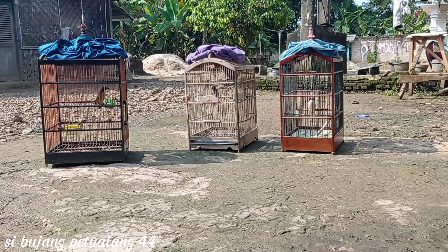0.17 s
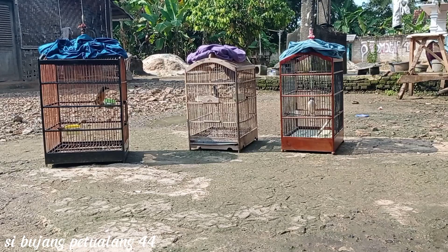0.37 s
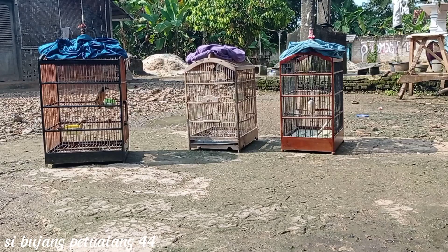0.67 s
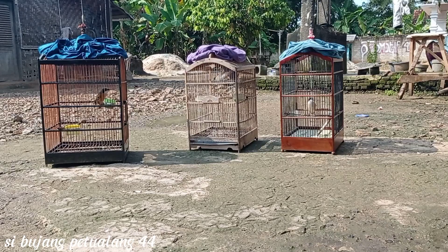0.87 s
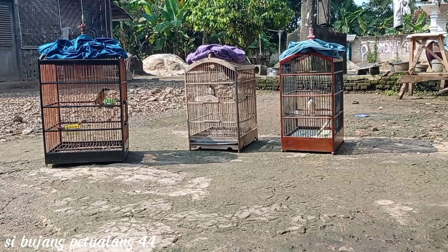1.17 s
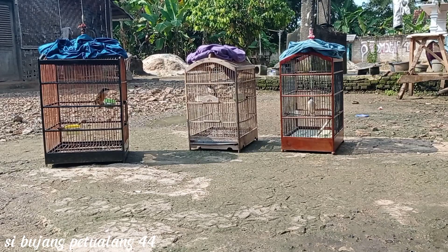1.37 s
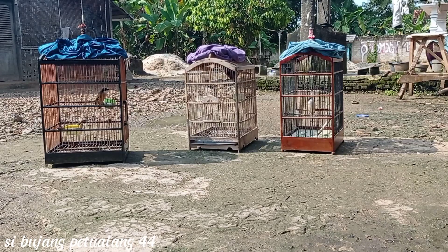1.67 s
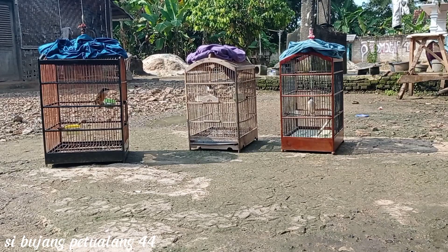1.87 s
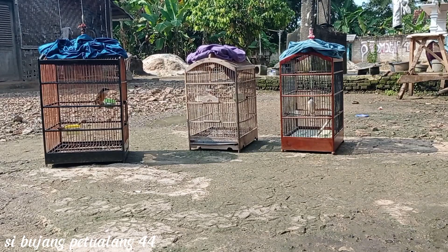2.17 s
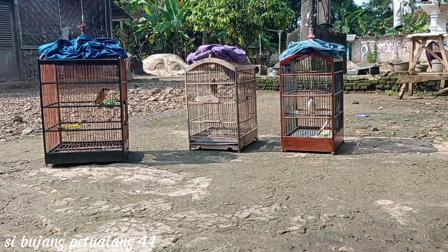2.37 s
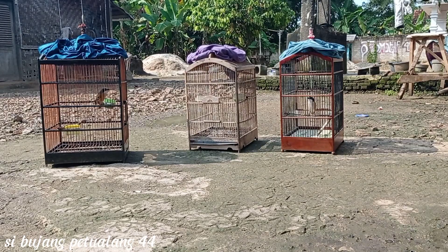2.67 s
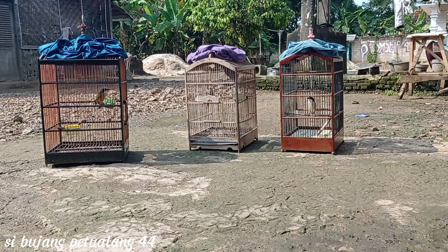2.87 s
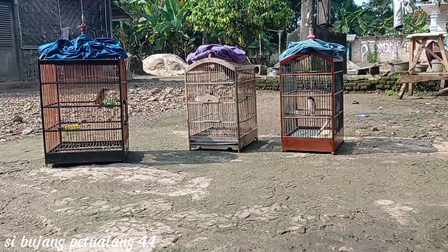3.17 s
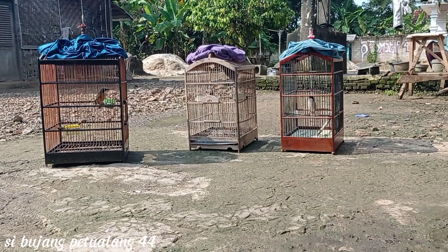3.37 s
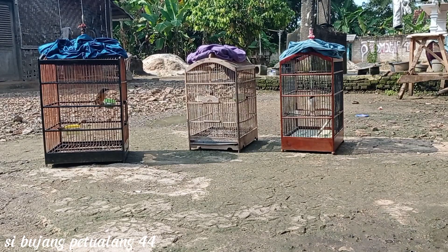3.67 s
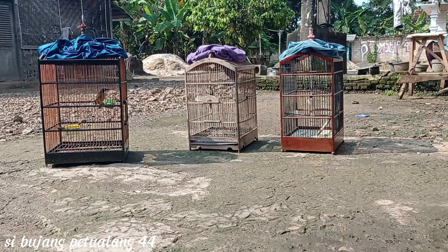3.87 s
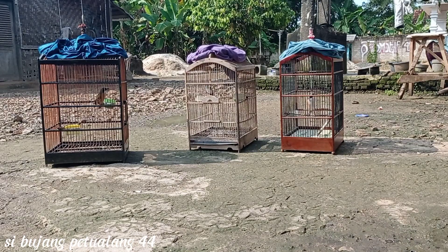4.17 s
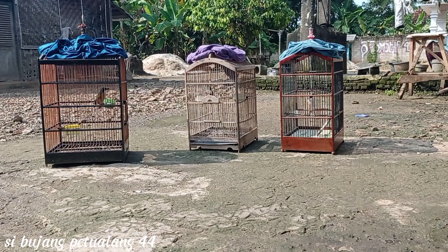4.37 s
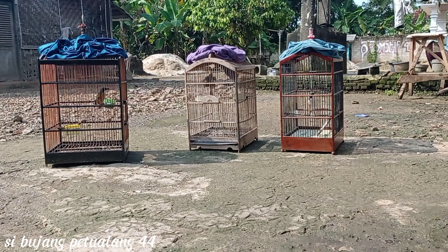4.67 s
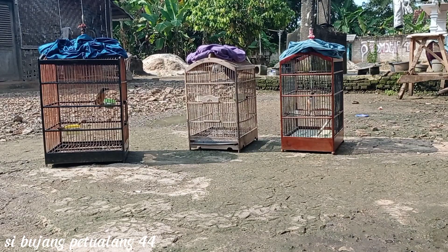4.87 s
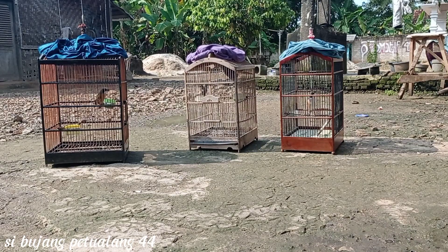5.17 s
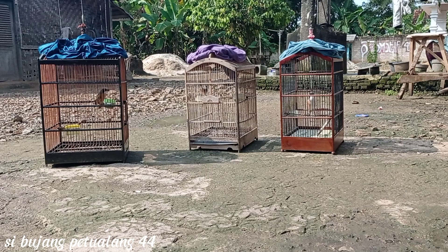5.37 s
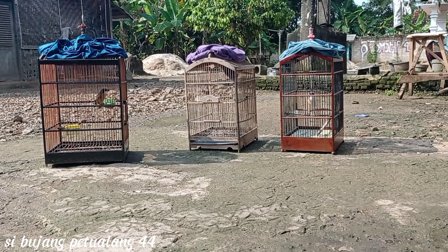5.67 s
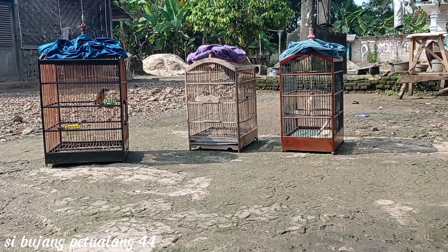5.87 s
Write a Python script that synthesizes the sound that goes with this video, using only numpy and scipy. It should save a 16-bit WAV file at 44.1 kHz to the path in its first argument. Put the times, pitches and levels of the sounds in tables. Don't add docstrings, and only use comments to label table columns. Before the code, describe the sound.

Abrupt raspy bird calls close by, answered by a breathier rival, over small far birds, a thin insect whine and a low engine.

```python
import sys
import numpy as np
from scipy import signal
from scipy.fft import rfft, irfft
from scipy.io import wavfile
from scipy.ndimage import uniform_filter1d, minimum_filter1d

SR = 44100
rng = np.random.default_rng(int(sys.argv[2]) if len(sys.argv) > 2 else 0)


def digitize_waveform(pressure):
    field = np.atleast_2d(pressure).T
    bounded = np.clip(field, -1, 1)
    quanta = np.round(bounded * 32767).astype(np.int16)
    wavfile.write(sys.argv[1], SR, quanta)


def voltage_ratio(level):
    return 10 ** (np.asarray(level, float) / 20)


N = 265217


def evened(x):
    return x / np.sqrt(np.mean(x ** 2) + 1e-20)


def read(points, hz):
    f, value = np.transpose(points)
    return np.interp(np.log(hz + 1), np.log(f + 1), value)


def curve(points, t):
    return np.interp(t, *np.transpose(points))


def play(sounds):
    track = np.zeros(N)
    for s, sound in sounds:
        part = track[round(s * SR):][:len(sound)]
        part += sound[:len(part)]
    return track


def wobble(size, hz):
    span = max(int(SR / hz / 2), 2)
    noise = rng.standard_normal(size + 4 * span)
    smooth = uniform_filter1d(uniform_filter1d(noise, span), span)
    return evened(smooth[2 * span:][:size])


def coloured(x, spectrum):
    gain = voltage_ratio(read(spectrum, np.fft.rfftfreq(len(x), 1 / SR)))
    return irfft(rfft(x) * gain, len(x))


def stack(hz, partials):
    turns = np.cumsum(hz) / SR
    return sum(g * np.cos(2 * np.pi * k * turns) for k, g in partials)


# (frequency [Hz], level [dB])
LATE_TREBLE = [(13600, -68), (14400, -18), (15200, -5), (16000, -30)]


def rasp(effort, arch, beak, flutter_hz, swing, depth, jitter, breath, late=0):
    s, effort_db = np.transpose(effort)
    t = np.arange(s[0], s[-1], 1 / SR)
    share = (t - s[0]) / 0.15
    hz = curve(arch, share)
    flutter = 2 * np.pi * np.cumsum(flutter_hz * (1 + 0.07 * wobble(len(t), 60))) / SR
    shake = jitter * (1 + 1.72 * share) * wobble(len(t), 540)
    hz = hz * (1 + swing * np.sin(flutter) + shake)
    tone = evened(stack(hz, [(k, 1) for k in range(1, 13)]))
    breath = np.clip(breath * (1 + 1.2 * share), 0, 1)
    drive = (1 - breath) * tone + breath * rng.standard_normal(len(t))
    drive *= (1 + depth * np.cos(flutter)) * voltage_ratio(2.2 * wobble(len(t), 300))
    lateness = np.clip((share - 0.35) / 0.75, 0, 1)
    whistle = late * lateness * coloured(drive, LATE_TREBLE)
    edge = np.minimum(1, np.minimum((t - s[0]) / 0.0019, (s[-1] - t) / 0.0045))
    return s[0], evened(coloured(drive, beak) + whistle) * voltage_ratio(np.interp(t, s, effort_db)) * edge


# (start [s], held [s], effort [dB], change while held [dB])
NEAR_RASPS = [
    (0.928, 0.076, -5, -4.5),
    (2.336, 0.057, -8.5, -0.5),
    (3.354, 0.064, -13.5, 4.5),
    (4.572, 0.066, -12, 1.5),
    (5.374, 0.069, -14.5, 8.5),
]
# (share of length, pitch [Hz])
NEAR_ARCH = [(0, 1070), (.1, 1190), (0.351, 1240), (.55, 1243), (0.718, 1075), (0.999, 896)]
# (frequency [Hz], level [dB per Hz])
NEAR_BEAK = [(700, -20.5), (1250, -21), (1800, -2.5), (2400, -0.5), (3050, 8.5), (3700, 1.5), (4400, -3),
             (5000, -12), (6400, -10.5), (8000, -19), (9800, -42.5),
             (12600, -31), (13300, -44), (13900, -60), (16000, -62)]


def snapped(s, held, db, change_db):
    full = s + 0.0083
    end = full + held
    return [(s, db - 29), (full, db), (end, db + change_db), (end + 0.09, db + change_db - 22.5)]


def near_bird():
    return play(rasp(snapped(*row), NEAR_ARCH, NEAR_BEAK, flutter_hz=228, swing=0.068,
                     depth=0.45, jitter=0.01, breath=0.11, late=1) for row in NEAR_RASPS)


# (start [s], time to the peak [s], peak effort [dB], fading [s])
RIVAL_RASPS = [
    (0.078, 0.078, -21.5, 0.18),
    (0.474, 0.11, -16.5, 0.13),
    (4.075, 0.11, -14, 0.084),
    (4.439, 0.12, -16.5, .14),
    (5.976, 0.038, -16.5, .1),
]
# (share of length, pitch [Hz])
RIVAL_ARCH = [(0, 1117), (.35, 1150), (0.652, 1316), (1.2, 1370)]
# (frequency [Hz], level [dB per Hz])
RIVAL_BEAK = [(700, -20.5), (1250, -17), (2000, -6), (2800, -3), (4000, 3.5), (5400, 3), (6500, -7),
              (8000, -12), (9800, -26)]
# (frequency [Hz], level [dB per Hz])
RIVAL_TOP = [(10600, -39.5), (13600, -29), (15000, -23), (16000, -20)]


def swelled(s, rise, db, fade):
    peak = s + rise
    return [(s, db - 20.5), (s + 0.022, db - 10), (peak, db), (peak + 0.42 * fade, db - 8), (peak + fade, db - 64)]


def rival_bird():
    return play(rasp(swelled(*row), RIVAL_ARCH, RIVAL_BEAK + RIVAL_TOP, flutter_hz=265, swing=0.065,
                     depth=0.5, jitter=0.019, breath=0.24) for row in RIVAL_RASPS)


def note(s, length, from_hz, to_hz, db, overtone_db, burr, flicker_db):
    u = np.linspace(0, 1, int(length * SR) + 8)
    hz = (from_hz + (to_hz - from_hz) * u) * (1 + burr * wobble(len(u), 450))
    low_notes = hz < 2250
    tone = stack(hz, [(1, 0.92), (2, voltage_ratio(overtone_db)), (3, voltage_ratio(overtone_db - 19)), (5, voltage_ratio(overtone_db - 47)),
                      (6, voltage_ratio(overtone_db - 44)), (7, voltage_ratio(overtone_db - 36) * low_notes)])
    edge = np.minimum(1, np.minimum(u * length / 0.0018, (1 - u) / 0.31))
    return s, voltage_ratio(db + 1.5 + flicker_db * wobble(len(u), 308)) * tone * np.sqrt(edge)


# (frequency [Hz], level [dB])
SONG_HISS = [(1400, -50), (1900, -20), (4000, 1), (7000, 1), (9000, -21), (12000, -17.5), (15000, -24)]


def breathy(song, db):
    strength = np.sqrt(abs(uniform_filter1d(song ** 2, 300)))
    return song + voltage_ratio(db) * coloured(strength * rng.standard_normal(N), SONG_HISS)


# (start [s], length [s], from [Hz], to [Hz], level [dB])
REEDY_NOTES = [
    (2.701, 0.017, 1845, 2040, -31),
    (2.709, 0.016, 2108, 3160, -18.5),
    (2.719, 0.0065, 2120, 3200, -20),
    (2.727, 0.0061, 2640, 2070, -14),
    (2.732, 0.0486, 2007, 2097, -17.5),
    (2.776, 0.0051, 2220, 3430, -14),
    (2.835, .032, 2194, 2866, -25),
]
# (start [s], length [s], from [Hz], to [Hz], level [dB])
PURE_NOTES = [(2.761, 0.018, 4295, 4360, -8), (2.779, 0.021, 6400, 6930, -10.5),
              (2.785, 0.0082, 5660, 3880, -18), (2.789, .014, 3550, 2740, -15),
              (2.792, 0.0295, 5120, 5450, -8), (2.816, .03, 6330, 5930, -15),
              (2.834, 0.0277, 5600, 6140, -16), (2.866, 0.0256, 3346, 3650, -17),
              (2.881, 0.021, 3900, 4200, -8), (2.889, .017, 2844, 2734, -16.5),
              (2.902, .0075, 4515, 4670, -5.5), (2.909, 0.012, 4630, 4860, -10.5),
              (2.935, 0.0526, 5030, 4643, -26), (3.002, 0.022, 4730, 4680, -22.5)]


def singer():
    reedy = play(note(*row, overtone_db=3.5, burr=0.008, flicker_db=1.5) for row in REEDY_NOTES)
    pure = play(note(*row, overtone_db=-33.5, burr=0.026, flicker_db=3.0) for row in PURE_NOTES)
    return breathy(reedy + pure, -7.5)


# (time [s], peak level [dB], centre [Hz])
KNOCKS = [(2.572, -40, 5895), (3.015, -22.5, 1020), (3.031, -20.5, 1120), (3.323, -26, 2977),
          (3.332, -39, 7010), (3.971, -44, 5000), (0.911, -33, 4800), (0.933, -27, 1836),
          (2.341, -14, 1700), (3.357, -29, 1700), (5.379, -28, 1700)]


def knock(s, db, hz):
    t = np.arange(1800) / SR
    tick = rng.standard_normal(len(t)) * voltage_ratio(db - 60 * t / 0.11)
    return s, coloured(tick, [(hz / 3, -22), (hz / 1.7, -2), (hz * 0.81, -2), (hz * 1.9, -14), (20000, -22)])


def cage_knocks():
    return play(knock(*row) for row in KNOCKS)


# (start [s], time to the peak [s], peak effort [dB], fading [s])
DISTANT_RASPS = [
    (1.75, .14, -37.5, 0.089),
    (5.85, 0.038, -35.5, 0.12),
]
# (start [s], starting pitch [Hz], level [dB])
RISING_CHIPS = [
    (1.345, 6550, -43),
    (1.856, 3890, -29.5),
    (2.093, 6270, -40),
    (2.202, 4500, -46),
    (2.647, 5800, -38),
    (4.821, 6400, -33.5),
    (5.035, 5780, -32.5),
    (5.893, 4960, -38),
    (5.858, 3700, -41),
]
# (start [s], starting pitch [Hz], level [dB])
LEVEL_CHIPS = [(0.265, 3657, -27.5), (0.776, 7670, -43), (0.834, 4560, -38), (1.493, 4210, -41.5),
               (1.562, 4280, -36.5), (1.756, 5470, -37), (1.767, 2775, -37), (1.815, 6500, -46),
               (2.294, 6260, -38), (3.305, 5450, -33.5), (3.296, 4483, -40), (3.91, 6260, -33.5),
               (5.036, 5120, -46.5), (5.209, 5870, -33), (5.21, 5100, -49), (5.21, 6800, -52),
               (2.285, 7400, -55), (5.364, 5950, -37), (5.942, 1684, -30)]
# (start [s], starting pitch [Hz], level [dB])
FALLING_TICKS = [(1.653, 3940, -38.5), (1.754, 3940, -34), (1.81, 3730, -33.5), (1.888, 3400, -29.5),
                 (1.918, 3820, -36), (3.63, 4000, -33), (3.69, 3930, -32.5), (3.753, 3930, -31),
                 (3.825, 4020, -35), (4.868, 7800, -45), (5.0, 7750, -52), (3.69, 6700, -44),
                 (3.752, 6500, -45.5), (3.825, 6840, -51), (5.165, 9090, -41)]
# (start [s], length [s], from [Hz], to [Hz], level [dB])
DRAWN_WHISTLES = [(1.669, 0.21, 3050, 3260, -46.5), (2.099, 0.22, 2850, 3050, -50),
                  (2.238, 0.13, 2800, 3120, -43.5), (3.717, 0.23, 2610, 2390, -44),
                  (5.123, 0.14, 1730, 1903, -36.5), (5.228, 0.081, 1706, 1400, -36),
                  (5.677, 0.1, 1807, 1700, -44.5), (5.783, 0.074, 1750, 1614, -39),
                  (5.833, 0.17, 1500, 1630, -43), (3.131, .04, 3900, 6970, -36),
                  (0.717, .2, 4100, 4080, -44), (5.897, 0.071, 7120, 7600, -42)]


def chips(rows, length, glide, overtone_db):
    return [(s, length, hz, hz * (1 + glide), db, overtone_db) for s, hz, db in rows]


def far_birds():
    rasps = play(rasp(swelled(*row), RIVAL_ARCH, RIVAL_BEAK + RIVAL_TOP, flutter_hz=240, swing=0.07,
                      depth=0.5, jitter=0.02, breath=0.4) for row in DISTANT_RASPS)
    calls = chips(RISING_CHIPS, 0.0295, 0.1, -30)
    calls += chips(LEVEL_CHIPS, 0.0343, -0.037, -35)
    calls += chips(FALLING_TICKS, 0.01, -0.052, -21)
    short = play(note(*row, burr=0.014, flicker_db=1.85) for row in calls)
    drawn = play(note(*row, overtone_db=-51, burr=0.024, flicker_db=2.5) for row in DRAWN_WHISTLES)
    return rasps + short + drawn


# (start [s], length [s], third partial [Hz], level [dB])
FOWL_CALLS = [
    (5.768, 0.13, 1090, -34),
    (5.89, 0.107, 1162, -29),
]


def honk(s, length, hz, db):
    u = np.linspace(0, 1, int(length * SR))
    roughness = (1 + 0.0055 * wobble(len(u), 206) + 0.0084 * wobble(len(u), 23.4))
    pitch = hz / 3 * (1 + 0.0427 * np.sqrt(u)) * roughness
    tone = stack(pitch, [(2, voltage_ratio(-7.5)), (3, 0.75), (4, voltage_ratio(-9.0)), (5, voltage_ratio(-21))])
    return s, voltage_ratio(db - 6 * u + wobble(len(u), 80)) * tone * signal.windows.tukey(len(u), 0.2)


def fowl():
    return play(honk(*row) for row in FOWL_CALLS)


# (frequency [Hz], level [dB])
DISTANCE = [(300, -6), (7000, 2), (9500, -29), (16000, -14)]


def from_afar(x):
    return coloured(x, DISTANCE)


# (start [s], length [s], starting pitch of the second partial [Hz], level [dB])
INSECT_PHRASES = [
    (0.075, .5, 5830, -47),
    (.6, 0.79, 5890, -47),
    (1.472, 0.85, 5890, -48.5),
    (2.505, 0.83, 5870, -45.5),
    (3.488, .65, 5880, -46.5),
    (4.203, 0.61, 5740, -49),
    (4.678, 0.68, 5850, -49.5),
    (5.394, 0.59, 5840, -47),
]


def whine(s, length, hz, db):
    t = np.arange(0, length, 1 / SR)
    pitch = (hz - 200 * t) / 2 * (1 + 0.0044 * wobble(len(t), 200))
    mid_db = db + 10.5 * (t / length - 1)
    top_db = db - 19 + 3 * t / length
    levels = [(1, mid_db - 3.5 + 4.7 * wobble(len(t), 3.3)), (2, mid_db), (3, top_db - 27), (4, top_db)]
    partials = [(k, voltage_ratio(g + 3.33 * wobble(len(t), 90) + 3.5 * wobble(len(t), 6.1))) for k, g in levels]
    return s, stack(pitch, partials) * signal.windows.tukey(len(t), 0.12)


def insect():
    return play(whine(*row) for row in INSECT_PHRASES)


# (time [s], level [dB], boom of the pipe and ground [Hz])
ENGINE = [(.08, -24, 145), (.26, -9.5, 159), (.6, -4, 112.5), (1.3, -5.5, 154.4), (1.9, -0.5, 131.6),
          (2.4, -6.5, 145), (2.68, 4.5, 160.4), (2.95, -10.5, 156), (3.25, 0.5, 145), (3.5, 4.5, 150),
          (3.62, -2, 160), (3.85, 3.5, 176.6), (4.05, 2, 147), (4.7, 4, 129.6), (4.9, 4, 150.8),
          (5.35, 2.5, 154), (5.56, -4, 156), (5.85, 1, 147)]
# (time [s], firings per second [Hz])
FIRING = [(0, 28.5), (1.2, 28.7), (2.0, 29.0), (2.9, 29.2), (3.4, 28.9), (4.0, 28.5), (6.02, 28.6)]
# (multiple of the firing rate, level [dB])
ORDERS = [(2, -65), (3, -40.5), (4, -42.5), (5, -45), (6, -47), (7, -52), (8, -81), (9, -78), (10, -52.5),
          (11, -47), (12, -44), (13, -58.5), (14, -60.5), (15, -67.5)]


def engine():
    t = np.arange(N) / SR
    s, *columns = np.transpose(ENGINE)
    loud_db, boom_hz = (np.interp(t, s, c) for c in columns)
    hz = curve(FIRING, t) * (1 + 0.0056 * wobble(N, 5.1))
    turns = np.cumsum(hz) / SR
    throb = np.zeros(N)
    for k, db in ORDERS:
        lift_db = 14 * np.exp(-(np.log(k * hz / boom_hz) / 0.13) ** 2)
        waver_db = 2.2 * wobble(N, 2.85) + 1.1 * wobble(N, 14.7)
        phase = 2 * np.pi * (k * turns + 0.31 * rng.random())
        throb += voltage_ratio(db + loud_db + lift_db + waver_db) * np.cos(phase)
    return throb


# (frequency [Hz], level [dB per Hz])
AIR = [(25, -41), (50, -37), (75, 7), (190, -9.5), (330, -7.5), (460, -16.5), (1070, -23), (1960, -35.5),
       (2290, -34.5), (3200, -30.5), (4900, -43), (5900, -31), (7670, -57.5), (16000, -60)]
# (time [s], level [dB])
AIR_SWELL = [(.14, -100), (.27, -54), (.4, -51.5), (1.2, -49.5), (2.1, -43.5), (2.67, -44), (2.8, -50.5),
             (3.2, -44.5), (4.2, -48), (4.45, -46), (6.01, -50.5)]


def air():
    frames, hz = N // 256 + 5, np.fft.rfftfreq(1024, 1 / SR)
    a, b, patches = rng.standard_normal((frames, 513, 3)).T
    patches_db = 3.0 * evened(uniform_filter1d(uniform_filter1d(patches, 10, 0), 16, 1))
    z = (a + 1j * b) * voltage_ratio(read(AIR, hz)[:, None] + patches_db)
    x = signal.istft(z, nperseg=1024, noverlap=768)[1][:N]
    return evened(x) * voltage_ratio(curve(AIR_SWELL, np.arange(N) / SR) + 13.5)


# (frequency [Hz], time to fall 60 dB [s])
YARD = [(800, 0.74), (2600, 0.44), (5000, 0.5), (8000, 0.32), (10500, 0.26), (14000, 0.13)]


def yard(x, first_s):
    taps = np.zeros(SR)
    at = np.arange(int(first_s * SR), SR - 20, 20)
    spots = at + rng.integers(0, 20, len(at))
    taps[spots] = rng.choice([-1., 1.], len(at))
    hz, t, z = signal.stft(taps, SR, nperseg=256)
    decay = voltage_ratio(-60 * t / read(YARD, hz)[:, None])
    tail = signal.istft(z * decay, SR, nperseg=256)[1]
    return signal.fftconvolve(x, tail / np.linalg.norm(tail))[:N]


def scene():
    near, rival = near_bird(), rival_bird()
    song = singer() + cage_knocks()
    far = from_afar(far_birds() + fowl())
    cages = near + voltage_ratio(2.0) * rival + song
    cage_echo = yard(voltage_ratio(-5.5) * near + voltage_ratio(-2.5) * rival + voltage_ratio(-9.5) * song, 0.006)
    far_echo = voltage_ratio(-5.5) * yard(far, 0.0054)
    return (cages + far + cage_echo + far_echo + insect() + engine() + air())[None]


def roll_off(x):
    return signal.sosfilt(signal.butter(12, 16730, fs=SR, output="sos"), x)


def record(dry):
    opened = dry * np.clip((np.arange(N) / SR - 0.078) / 0.0017, 0, 1)
    crest = -minimum_filter1d(-abs(opened), size=133)
    limited = opened / uniform_filter1d(np.maximum(crest / 0.97, 1), size=67)
    thinned = signal.sosfilt(signal.butter(4, 62, "high", fs=SR, output="sos"), limited)
    lowpass = signal.firwin(511, 15650, window=("kaiser", 9), fs=SR)
    mix = signal.oaconvolve(thinned, lowpass[None], "same")
    return roll_off(np.clip(mix, -1, 1))


dry = scene()
out = record(dry)
digitize_waveform(out)
```